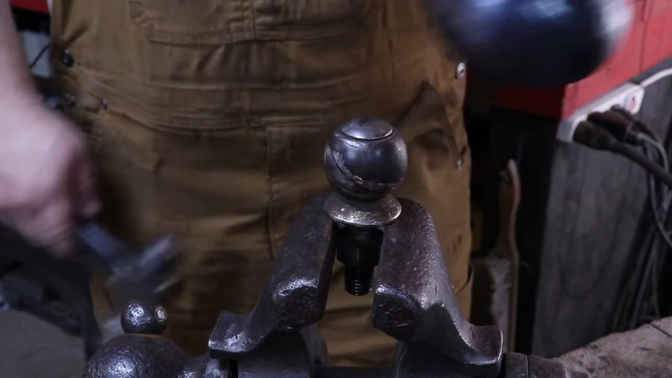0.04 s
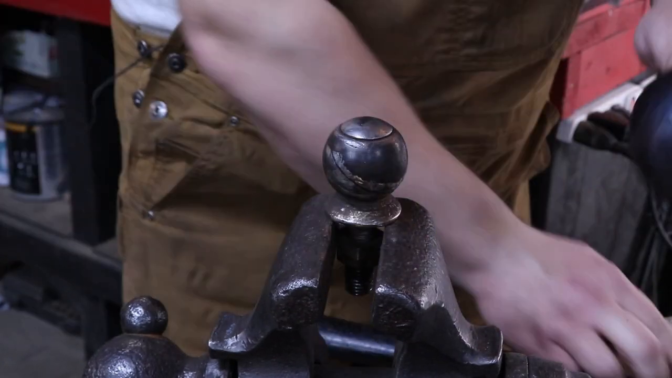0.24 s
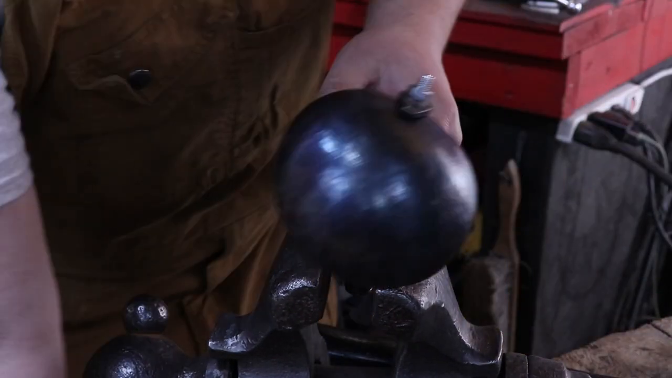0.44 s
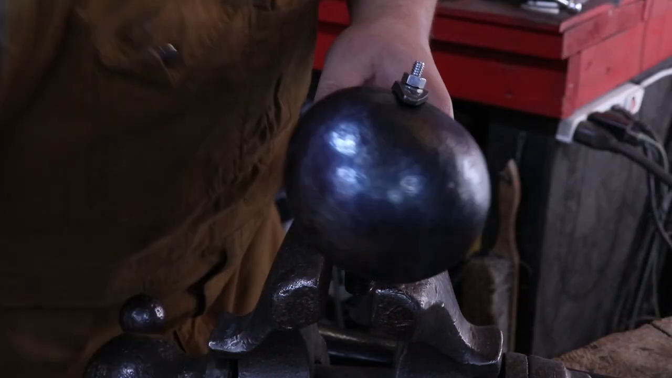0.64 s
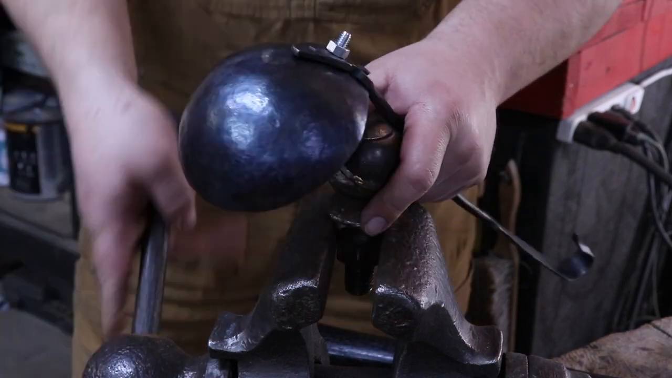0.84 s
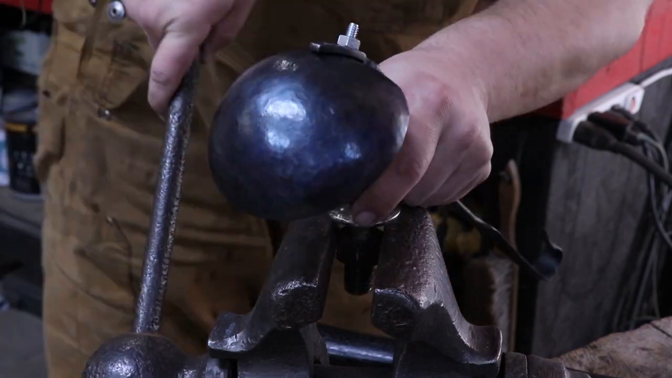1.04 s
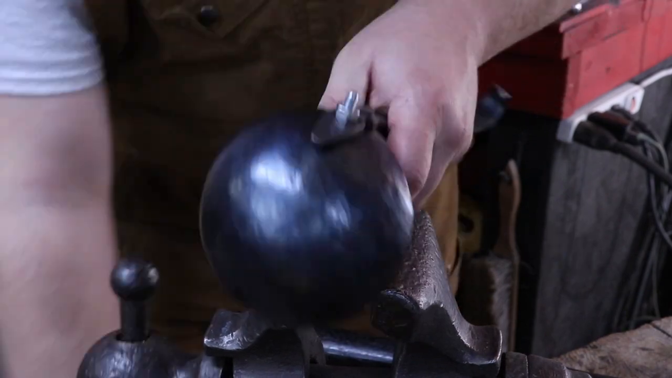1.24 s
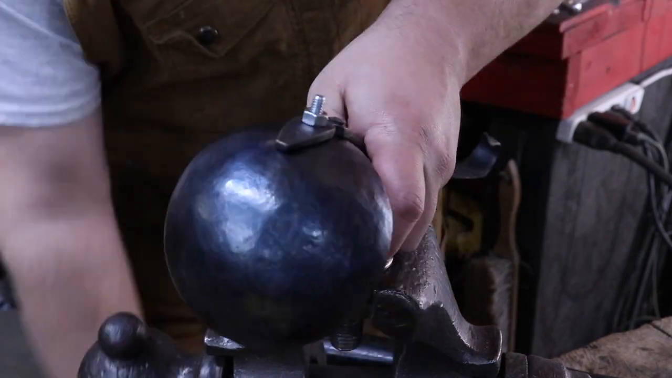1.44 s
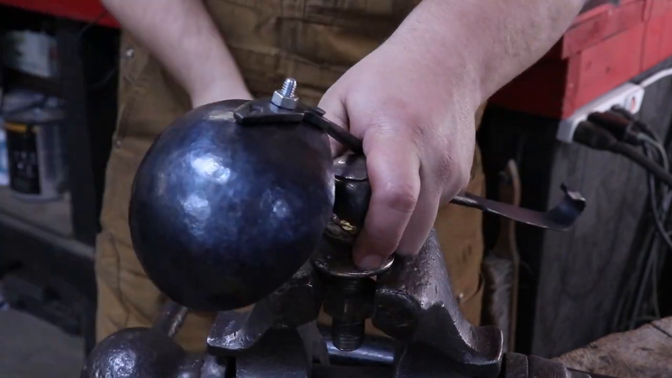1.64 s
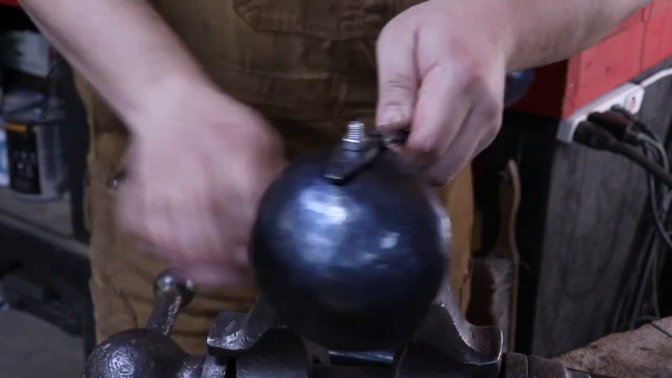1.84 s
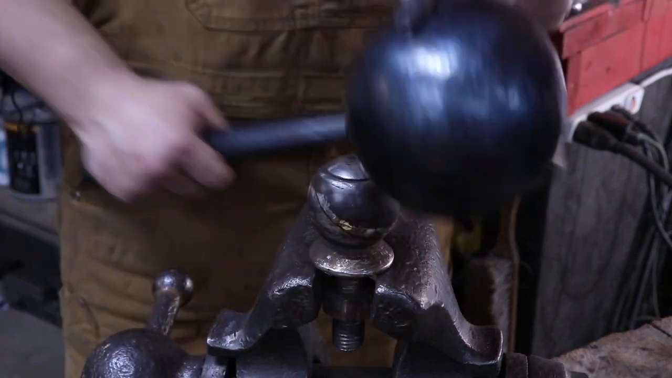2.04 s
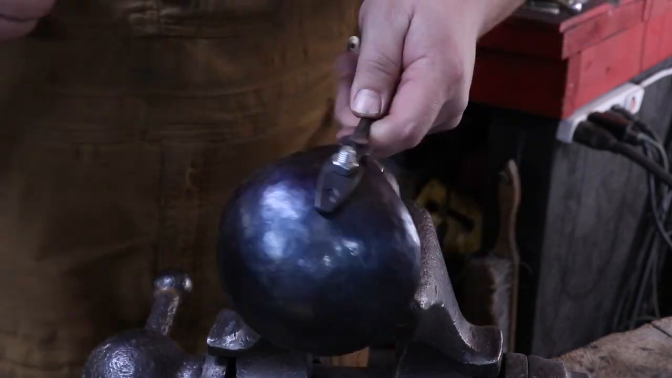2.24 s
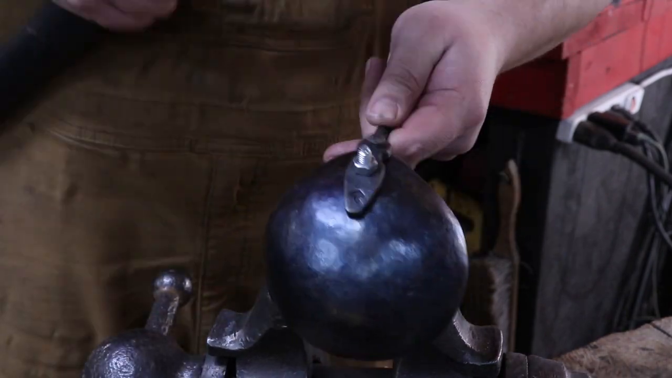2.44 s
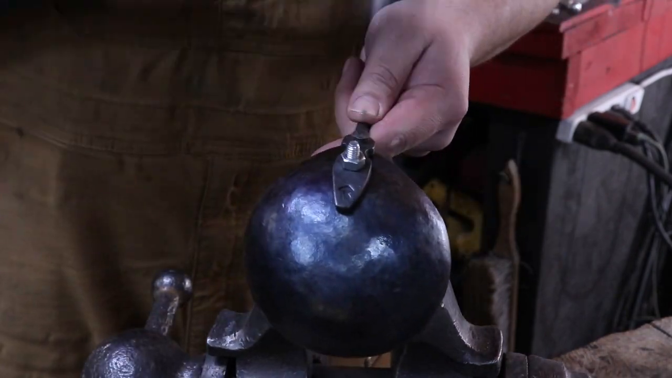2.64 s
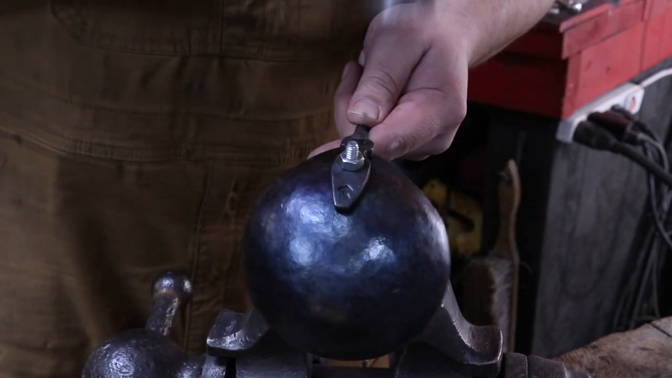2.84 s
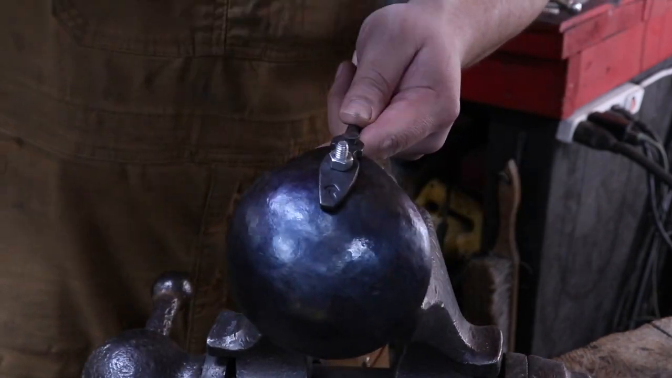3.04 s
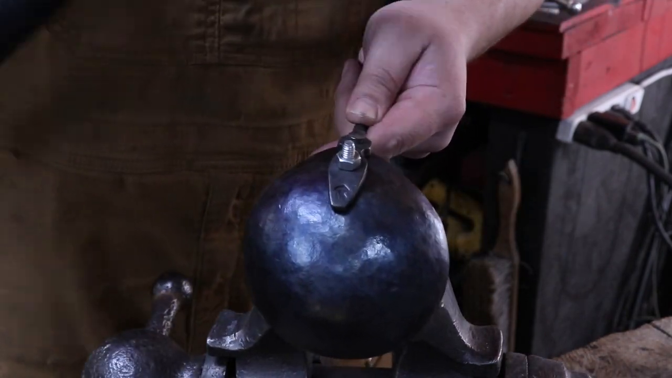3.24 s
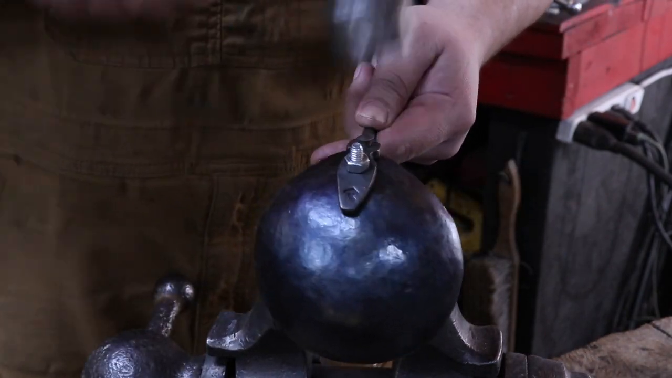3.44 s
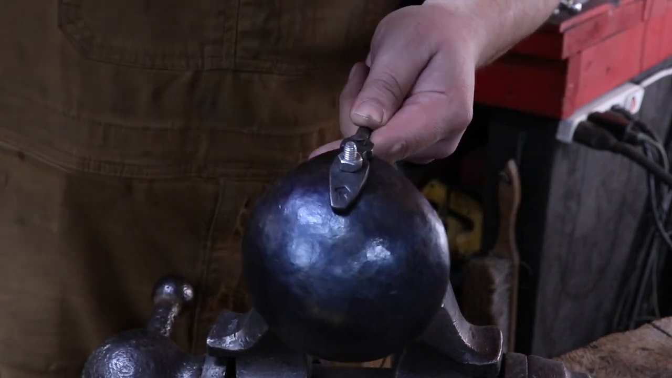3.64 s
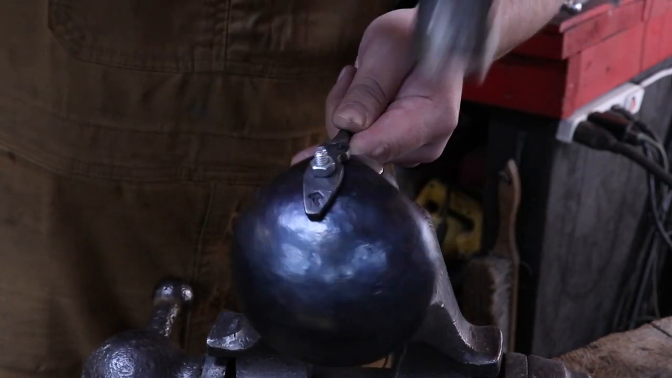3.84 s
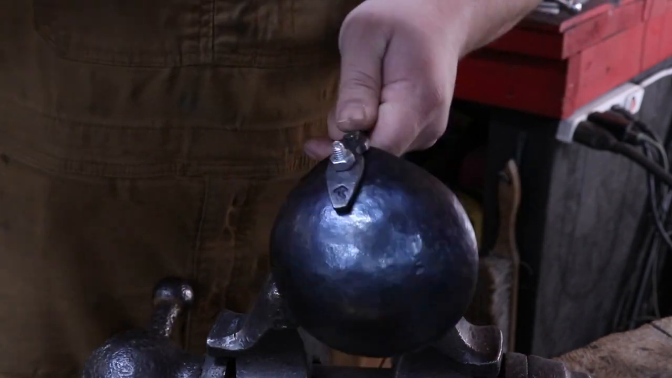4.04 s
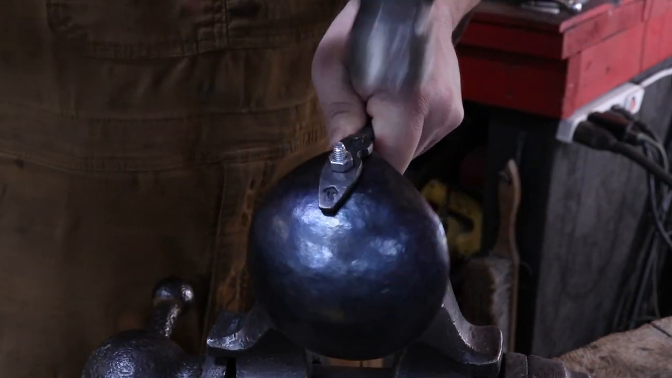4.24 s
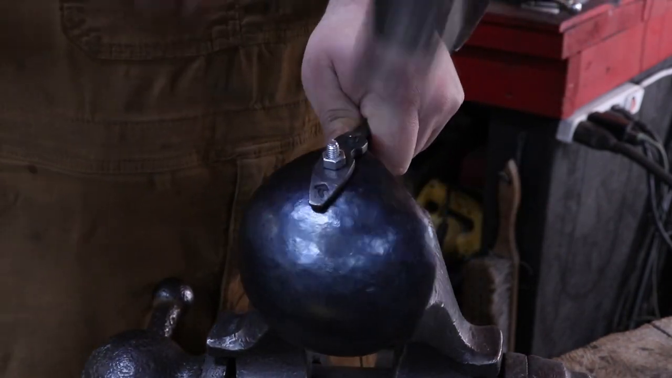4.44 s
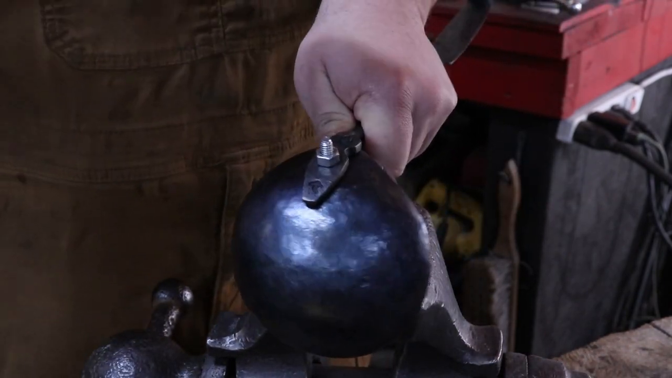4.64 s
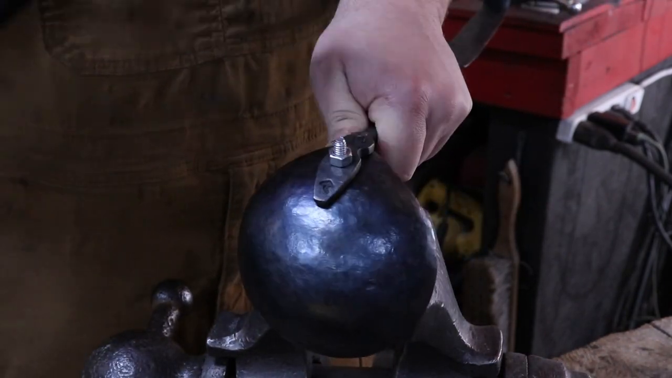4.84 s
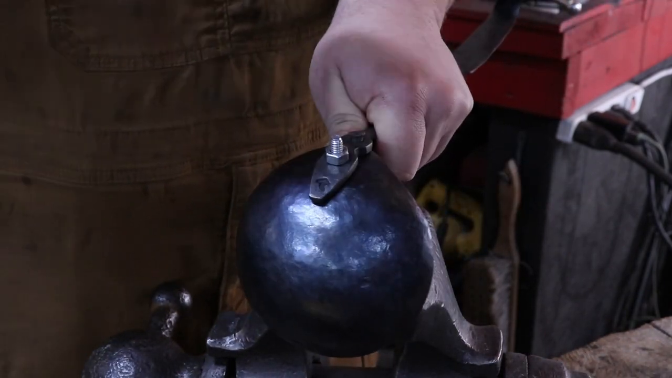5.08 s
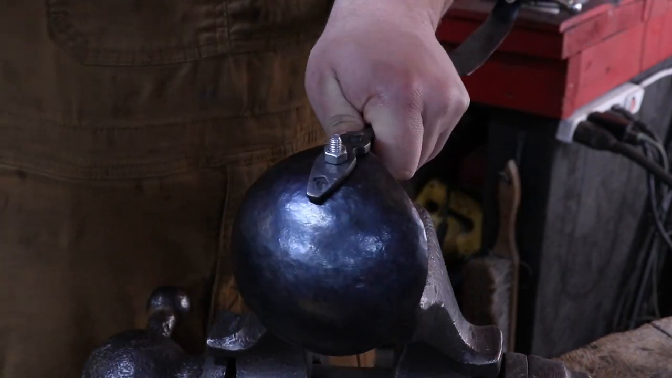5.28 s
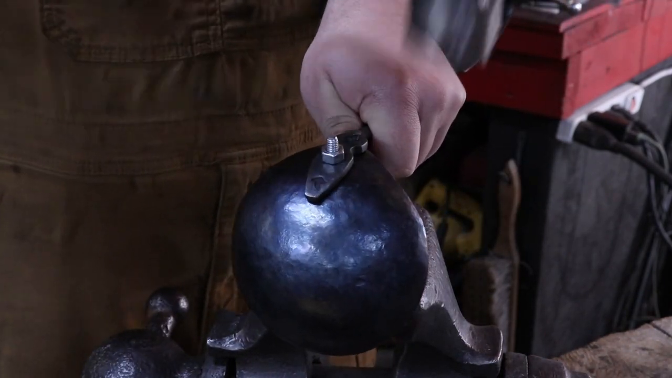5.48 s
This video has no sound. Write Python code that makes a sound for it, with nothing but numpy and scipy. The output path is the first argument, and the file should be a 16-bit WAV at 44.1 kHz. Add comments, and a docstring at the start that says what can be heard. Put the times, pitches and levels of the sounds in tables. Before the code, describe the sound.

In a quiet little workshop, steel knocks and slides against steel while sleeves brush softly. After about two seconds and a brief muffled rustle near the microphone, fast hammering begins on the bolt end of a hollow steel ball. The bright, quickly damped clangs come in two even, rattling runs, separated by a short gap with a few faint ticks. The sound is close, with little echo.

```python
"""In a small workshop, a hollow steel ball with a bolted-on handle is shifted about on a stake,
a steel support held in a vise. The steel clinks and scrapes, and sleeves brush softly.
A dull rustle passes close to the microphone, then a hammer flattens the bolt end over its nut
in quick runs of blows. Each blow cracks and sets the hand-held ball ringing;
after many of the cracks the level dips briefly."""
import sys
import numpy as np
from scipy import signal
from scipy.fft import rfft, irfft
from scipy.io import wavfile
from scipy.ndimage import uniform_filter1d

SR = 44100
rng = np.random.default_rng(int(sys.argv[2]) if len(sys.argv) > 2 else 0)


def bounce(signal):
    """Save signal as a 16-bit WAV file at the path given by the first command-line argument."""
    frames = np.transpose(np.atleast_2d(signal))
    limited = np.clip(frames, -1, 1)
    pcm = np.round(limited * 32767).astype(np.int16)
    wavfile.write(sys.argv[1], SR, pcm)


N = 242991
TIME = np.arange(N) / SR
AGE = TIME[:SR // 3]  # seconds since a contact
PUSH_RISE_S, PUSH_FADE_S = 0.017, 0.091  # how a push of the hand builds up and dies away

# The ringing tones of the ball, bolt and hammer head, damped by the hand.
# Each row: pitch in Hz, level in dB, seconds to fade by 60 dB.
BALL_TONES = [(402, -33, .18), (615, -20, .13), (858, -20, .17), (940, -16, .11), (1043, -11, .12),
              (1371, -13, .15), (1502, -14, .11), (1577, -12, .12), (1660, -17, .11), (1914, -15, .14),
              (2170, -17, .11), (2370, -18, .1), (2690, -20, .12), (3164, -17, .11), (3280, -17, .1),
              (3485, -18, .12), (3715, -18, .11), (4270, -21, .11), (5471, -15, .12), (5566, -16, .12),
              (5700, -18, .12), (6989, -16, .11), (7100, -15, .11), (7235, -13, .12), (7345, -10, .09),
              (7650, -19, .08), (10330, -17, .1), (10457, -14, .1)]
# The tones of the stake when knocked or rubbed. Each row: pitch in Hz, width in Hz, level in dB.
STAKE_TONES = [(640, 60, 2), (960, 160, -1), (1500, 260, 4), (2330, 100, 3), (3420, 120, 1), (3700, 45, 4),
               (4650, 200, -4), (5650, 180, -1), (6150, 120, -3), (6860, 140, 2), (7700, 140, -4),
               (8350, 160, -2), (11350, 400, 1), (13400, 700, -6), (15200, 700, -7)]
# The tone colour of the workshop's echo. Each row: frequency in Hz, level in dB.
ROOM_COLOUR = [(100, -49), (400, 4.5), (900, 8), (1500, 1), (2500, -0.5), (5000, -2.5), (9000, -12),
               (16000, -7.5)]


def amp(db):
    """Turn decibels into a gain."""
    return 10 ** (np.asarray(db) / 20)


def unit(x):
    """Scale a sound to an average (rms) level of 1."""
    return x / np.sqrt(np.mean(x ** 2))


def colour(x, points):
    """Shape a sound's tone along a curve of (Hz, dB) points, at an average level of 1."""
    hz, db = np.transpose(points)
    freqs = np.maximum(np.fft.rfftfreq(len(x), 1 / SR), 1)
    gain = amp(np.interp(np.log(freqs), np.log(hz), db))
    return unit(irfft(rfft(x) * gain, len(x)))


def noise(points, size):
    """Noise with the given tone colour."""
    return colour(rng.standard_normal(size), points)


def below(x, hz):
    """The part of a sound that lies under a frequency."""
    return signal.sosfiltfilt(signal.butter(2, hz, fs=SR, output="sos"), x)


def fade(seconds):
    """A gain that falls by 60 dB in the given time."""
    return np.exp(-np.log(1000) * AGE / seconds)


def wander(per_second, size=N):
    """A random drift around zero, with a spread near 1."""
    times = np.arange(0, TIME[-1] + 1, 1 / per_second)
    return np.interp(TIME[:size], times, rng.standard_normal(len(times)))


def grains(per_second, spread_db):
    """Tiny random impacts of uneven size."""
    impacts = (rng.random(N) < per_second / SR) * rng.standard_normal(N)
    return impacts * amp(spread_db * np.minimum(rng.exponential(size=N), 4))


def add(track, start, sound):
    """Mix a sound in at a start time in seconds."""
    i = max(int(start * SR), 0)
    track[i:i + len(sound)] += sound[:N - i]


def strokes(events, rise_s=PUSH_RISE_S, fade_s=PUSH_FADE_S, sag_db_per_s=0):
    """The gain over time of a set of movements: each rises, holds or sags, then dies away."""
    power = np.zeros(N)
    for start, length, db in events:
        rise = np.clip((TIME - start) / rise_s, 0, 1) ** 2
        sag = amp(-sag_db_per_s * np.clip(TIME - start, 0, length))
        release = np.exp(-np.log(1000) * np.maximum(TIME - start - length, 0) / fade_s)
        power += (amp(db) * rise * sag * release) ** 2
    return np.sqrt(power)


def resonate(force, tones, contact_db, wander_db=-4.0):
    """A force makes steel ring; its tones trade strength as the point of contact moves."""
    # The broad contact noise beneath the tones. Each row: frequency in Hz, level in dB.
    contact_colour = [(40, -53), (200, -81), (400, -27), (700, -11.5), (2000, -3), (5000, -5), (9000, -3.5),
                      (16000, -12)]
    ring = np.zeros(len(force))
    for hz, width, db in tones:
        drive = force * amp(db + wander_db * wander(35, len(force)))
        ring += signal.lfilter(*signal.iirpeak(hz, hz / width, fs=SR), drive)
    return unit(unit(ring) + amp(contact_db) * colour(force, contact_colour))


def room_air():
    """The quiet air of the workshop: a faint noise that drifts in level."""
    # Its tone colour. Each row: frequency in Hz, level in dB.
    air_colour = [(25, -19), (100, -25), (250, -5), (600, 2), (1600, -2), (3000, -3.5), (8000, -10),
                  (16000, -12)]
    return noise(air_colour, N) * amp(-65 + 2.5 * wander(7.23))


def room_echo(x, echo_db=-11.5, fade_s=0.21):
    """The small room adds a short, dull echo to a sound."""
    tail = noise(ROOM_COLOUR, len(AGE)) * fade(fade_s) * (1 - fade(0.018))
    return x + amp(echo_db) * signal.fftconvolve(x, tail / np.linalg.norm(tail))[:N]


def rubbing():
    """Sleeves and palms brush past as the hands change their grip."""
    # The rubs. Each row: start in seconds, length in seconds, level in dB.
    rubs = [(-.02, 0.19, -63.5), (.32, 0.098, -59), (.5, 0.095, -68.5), (1.49, 0.16, -68.5),
            (1.92, 0.16, -61.5), (2.13, 0.055, -48), (3.86, 0.075, -59), (4.18, .04, -57),
            (4.74, .055, -57)]
    # Their soft band of noise. Each row: frequency in Hz, level in dB.
    rub_colour = [(300, -26), (900, -10.5), (1550, -1), (2600, -8), (5000, -21), (16000, -24)]
    return noise(rub_colour, N) * strokes(rubs) * amp(2.9 * wander(30.36))


def rustle():
    """A dull, lumpy rustle close to the microphone, with a thin hiss riding on it."""
    # Its two swells. Each row: start in seconds, length in seconds, level in dB.
    swells = [(2.277, 0.15, -30), (2.422, .07, -35.5)]
    # The tone colours of the dull part and the hiss. Each row: frequency in Hz, level in dB.
    rumble_colour = [(29, -81), (50, -51), (133, -32), (167, -16), (235, -12), (275, -5.5), (353, -6),
                     (407, -1), (513, -3.5), (670, -5), (3500, -35), (4550, -63), (7700, -120)]
    hiss_colour = [(800, 2), (2500, 1), (5000, -2), (8000, 0.5), (9200, 1), (10000, 0.5), (11400, 1.5),
                   (13000, -7), (16000, -8)]
    rumble = colour(grains(per_second=1500, spread_db=-1.5), rumble_colour)
    hiss = amp(-12) * noise(hiss_colour, N)
    return (rumble + hiss) * strokes(swells, rise_s=0.016, fade_s=0.18, sag_db_per_s=59)


def scraping():
    """Steel slides in uneven catches, each a burst of tiny impacts; a firm push makes it squeal."""
    # The ball slides on the stake, and the hammer head is dragged off the bench.
    # Each row: start in seconds, length in seconds, level in dB.
    ball_slides = [(-.015, 0.064, -58), (.35, 0.048, -63), (.655, 0.037, -44.5), (.688, 0.1, -38),
                   (.83, 0.036, -35.5), (.862, 0.036, -33.5), (1.005, 0.046, -60.5), (1.11, .13, -53.5),
                   (1.243, 0.035, -40.5), (1.3, 0.015, -47.5), (1.37, 0.038, -53), (1.608, 0.046, -59),
                   (1.762, .08, -36.5), (1.85, 0.068, -52.5), (2.07, 0.08, -52), (2.214, 0.02, -42),
                   (3.87, 0.15, -62.5)]
    hammer_drag = [(2.14, 0.041, -43)]
    # The tones of steel that sticks and slips, and of the dragged hammer head.
    # Each row: pitch in Hz, width in Hz, level in dB.
    squeal_tones = [(3685, 33, -3), (5720, 91, 3.5), (6845, 30, 6), (11000, 170, -3), (11840, 290, -5)]
    drag_tones = [(1250, 72, 12), (1580, 200, 5), (2010, 170, 2), (2500, 420, -5), (7700, 120, -6),
                  (8450, 300, 2)]
    friction = grains(per_second=4500, spread_db=2.6) * amp(3 * wander(200))
    push = strokes(ball_slides)
    slide = resonate(friction, STAKE_TONES, contact_db=-7, wander_db=4.5) * push
    firm_push = amp(-37)
    squeal_gain = amp(-46) * (push / firm_push) ** 1.5  # grows faster than the push does
    squeal = resonate(rng.standard_normal(N), squeal_tones, contact_db=-34) * squeal_gain
    drag = resonate(friction, drag_tones, contact_db=0) * strokes(hammer_drag)
    steel = slide + squeal + drag
    return steel - below(steel, 332)  # the scraping carries little below about 330 Hz


def taps(events, tones, contact_db):
    """Steel taps steel: a sharp tick, then the ring of the thing that was touched."""
    out = np.zeros(N)
    tick = amp(2) * fade(0.012)
    onset = 1 - fade(0.0011)
    for start, db, body_db, fade_s in events:
        ring = resonate(rng.standard_normal(len(AGE)), tones, contact_db)
        ring = ring + (amp(body_db) - 1) * below(ring, 4500)
        add(out, start, amp(db - 10.5) * ring * (fade(fade_s) + tick) * onset)
    return out


def clinks():
    """The ball knocks on the stake, a loose steel bar bounces, and the ball and bolt get light touches."""
    # The three kinds of contact. Each row: start in seconds, level in dB,
    # boost or cut below 4500 Hz in dB, seconds to fade by 60 dB.
    stake_knocks = [(.118, -47.5, 9, 0.0081), (.210, -26, -0.5, 0.021), (.2515, -15, -5.5, 0.12),
                    (.659, -29, -3, 0.054), (.699, -22, -0.5, 0.052), (.7445, -17, 2, 0.058),
                    (1.125, -42.5, 10.5, .04), (1.343, -28.5, -5, 0.056), (1.386, -29.5, 0.5, 0.063),
                    (1.409, -31.5, -1.5, 0.026), (1.837, -27, 4, 0.089), (1.877, -26.5, -1, 0.036),
                    (1.891, -32, -6, 0.036), (1.906, -30.5, -5, 0.061)]
    bar_bounces = [(0.429, -19.5, 0.5, 0.091), (.484, -26, -4, 0.037), (.501, -28, -7, 0.014),
                   (.525, -26.5, -6, 0.039), (0.567, -30, -6, 0.025), (0.619, -25.5, -5.5, 0.083)]
    ball_touches = [(2.0705, -13.5, -15, 0.028), (2.082, -23, -16, 0.075), (2.122, -21, -25, 0.1),
                    (2.262, -31, -8, 0.14), (3.155, -41.5, 9.5, .03), (3.915, -36.5, 1, 0.079),
                    (3.961, -37, -4, 0.059), (4.014, -36.5, 0, 0.094), (4.027, -31.5, -3.5, 0.04),
                    (4.051, -39, 1.5, 0.028), (4.087, -47, -17, 0.02)]
    # The tones of the loose bar. Each row: pitch in Hz, width in Hz, level in dB.
    bar_tones = [(680, 140, -8), (1100, 250, -9), (2350, 110, -2), (3150, 80, -5), (3400, 70, -4),
                 (4350, 90, -5), (6380, 200, 1), (6950, 150, 5), (9890, 120, 0), (10550, 90, -1),
                 (10900, 90, -1), (11600, 100, -5), (13300, 220, -1), (14750, 160, -6)]
    touch_tones = [(hz, 45, db) for hz, db, _ in BALL_TONES]  # each 45 Hz wide
    return (taps(stake_knocks, STAKE_TONES, contact_db=3)
            + taps(bar_bounces, bar_tones, contact_db=-10)
            + taps(ball_touches, touch_tones, contact_db=1))


def level_dip(return_ms, crack_ms=1.34, recover_ms=4.0):
    """After a softened crack the sound drops out, then swells back; a long gap has a second tick."""
    if return_ms <= 1:
        return 1
    ms = AGE * 1000
    crack = amp(-10.5) * (ms < crack_ms)
    second_tick = amp(-4) * (abs(ms - 3.4) < 0.9) * (return_ms > 10)
    swell_db = -7.5 * np.exp(-np.maximum(ms - return_ms, 0) / recover_ms)
    swell = (ms > return_ms) * amp(swell_db)
    return uniform_filter1d(crack + second_tick + swell, 12)


def ball_ring(bolt_db):
    """The struck ball, bolt and hammer head ring with many tones, each fading at its own pace."""
    hz, tone_db, fade_s = np.transpose(BALL_TONES)
    high = hz > 3000
    bolt = (hz > 6800) & (hz < 7800)
    strength, detune, phase = rng.standard_normal((3, len(hz)))
    # The hammer never lands on quite the same spot, which matters most to the high tones.
    gain = amp(tone_db + np.where(high, 2.8, 1.2) * strength + bolt_db * bolt)
    pitch = hz * (1 + np.where(high, 0.004, 0.002) * detune)  # the grip shifts it a little
    # The loose nut and handle chatter against the ball and roughen every tone.
    chatter = 0.14 * np.array([wander(160, len(AGE)) for _ in hz])
    cycles = np.outer(pitch, AGE) + phase[:, None] + chatter
    fades = np.array([fade(seconds) for seconds in fade_s])
    return gain @ (fades * np.sin(2 * np.pi * cycles))


def hammer():
    """Each blow is a crack, a dense clang, the ball's ring and a thud; the room rings on behind it."""
    # The blows. Each row: start in seconds, level in dB, boost or cut of the bolt's tones near
    # 7000 Hz in dB, milliseconds until the sound returns from its dip (1 or less means no dip).
    blows = [(2.561, -28.5, 3, 0), (2.6606, -18.5, 5, 0), (2.7445, -18, -2, -0.5), (2.824, -17, 3, -0.5),
             (2.9003, -16, -3, 20.5), (2.9785, -18.5, 6, 3), (3.061, -20, -2, 0), (3.175, -25, -5, 0),
             (3.2695, -16.5, -6, 18), (3.3434, -18, 2.5, 4.5), (3.428, -18, 1, 3.5), (3.513, -18.5, 0, 1.5),
             (3.5943, -17.5, 3, 3), (3.6741, -19.5, 4, 4.5), (3.751, -18, 3.5, 21),
             (3.8267, -20.5, -6, 1.2), (4.1407, -33.5, 6, 0), (4.2307, -26, 4.5, 0), (4.3067, -20, 5.5, 3),
             (4.381, -20.5, 4.5, 0), (4.4589, -22, 7, 0), (4.5321, -20.5, 6.5, 2), (4.6086, -21, -1, 3.5),
             (4.6862, -20, 7, -0.5), (4.8012, -21, 2.5, 19), (4.8777, -18.5, -6, 3), (4.9524, -17.5, -5, 4),
             (5.0264, -18.5, -1, 4), (5.1008, -18.5, 2, 2.5), (5.1723, -19, 2.5, 4),
             (5.2432, -19.5, 3.5, 2.2), (5.3163, -20, 2.5, -0.5), (5.3859, -17, -20, 25.5),
             (5.4602, -22, -3, 1.6)]
    # The crowd of weaker tones between the ball's main ones. Each row: frequency in Hz, level in dB.
    clang_colour = [(60, -27), (150, -54), (300, -33), (500, -16.5), (900, 4), (1500, 0.5), (2200, 0),
                    (3300, 1.5), (4700, -3.5), (7100, 2), (8800, -4), (10500, -0.5), (12300, -3.5),
                    (16000, -6.5)]
    # The vise and bench under the blow. Each row: frequency in Hz, level in dB.
    thud_colour = [(25, -30), (70, -20), (140, -22), (310, 0), (500, 6), (1000, -2), (4000, -60)]
    out = np.zeros(N)
    onset = 1 - fade(0.0019)
    for start, db, bolt_db, return_ms in blows:
        ring = amp(-1.5) * ball_ring(bolt_db)
        clang = amp(-2.5) * noise(clang_colour, len(AGE)) * fade(0.11)
        # Light taps are mostly crack; in loud blows the crack is softened against the ring.
        crack = amp(2.5 - 0.29 * (db + 17)) * noise(clang_colour, len(AGE)) * fade(0.022)
        steel = ring + clang + crack
        low = below(steel, 3300)
        brightness_db = 0.4 * (db + 17.5)  # a harder blow is brighter
        steel = amp(-brightness_db / 2) * low + amp(brightness_db / 2) * (steel - low)
        thud = amp(-26) * noise(thud_colour, len(AGE)) * fade(0.11)
        echo = amp(-20.5) * noise(ROOM_COLOUR, len(AGE)) * fade(0.18) * (1 - fade(0.039))
        add(out, start, amp(db) * (steel + thud + echo) * onset * level_dip(return_ms))
    return out


def scene():
    """Handling, rustle and hammering over the still air of the room, in one channel."""
    air = room_air()
    handling = room_echo(clinks() + scraping()) + rubbing()
    return (air + handling + rustle() + hammer())[None]


def record(dry, bass_hz=260, top_hz=15900):
    """The microphone thins the bass and the recorder cuts the highest treble."""
    thinned = signal.sosfilt(signal.butter(1, bass_hz, "high", fs=SR, output="sos"), dry)
    return signal.sosfilt(signal.ellip(8, 0.2, 70, top_hz, fs=SR, output="sos"), thinned)


dry = scene()
out = record(dry)
bounce(out)
```